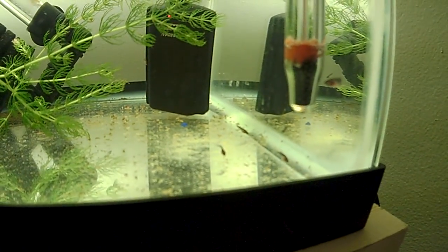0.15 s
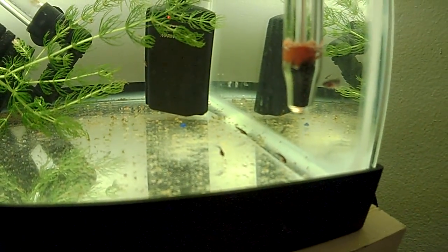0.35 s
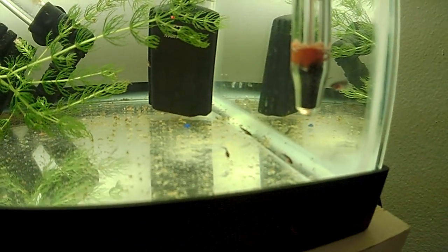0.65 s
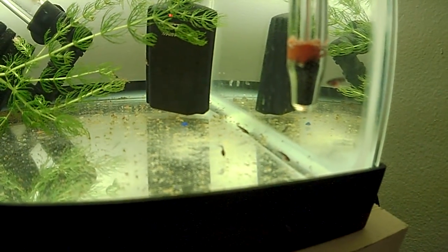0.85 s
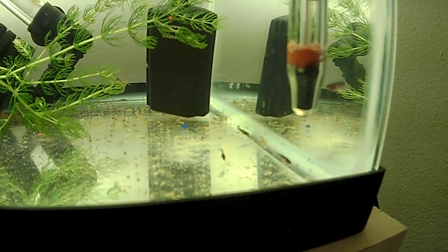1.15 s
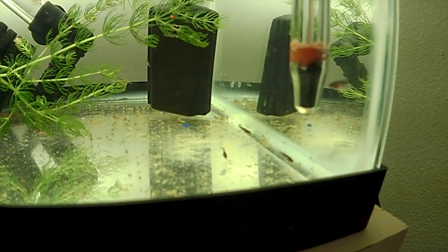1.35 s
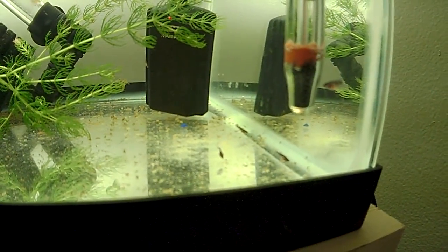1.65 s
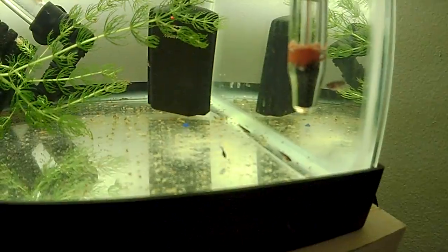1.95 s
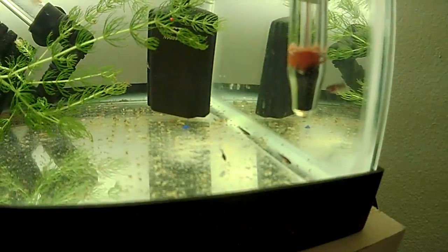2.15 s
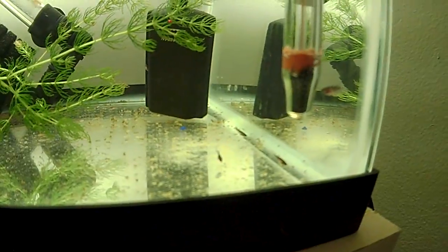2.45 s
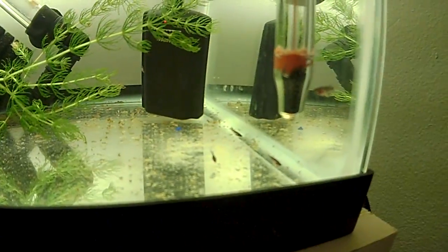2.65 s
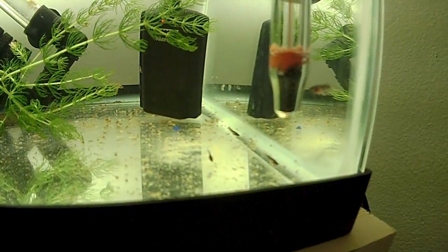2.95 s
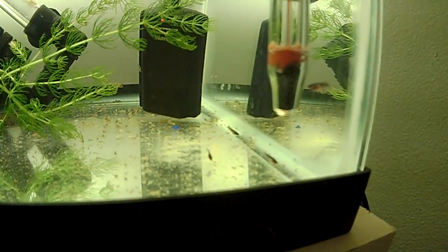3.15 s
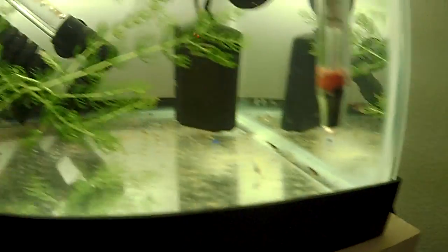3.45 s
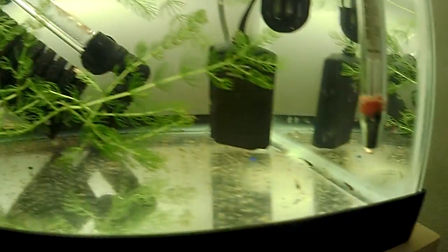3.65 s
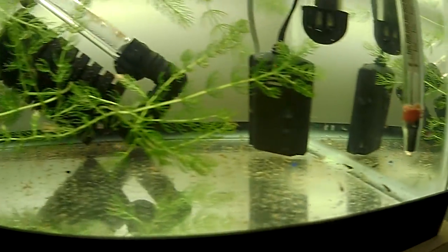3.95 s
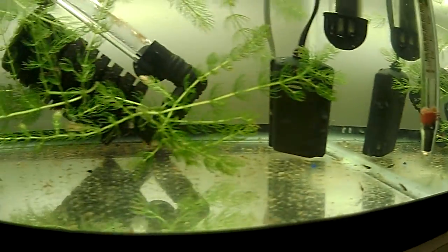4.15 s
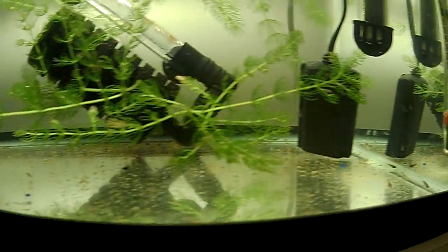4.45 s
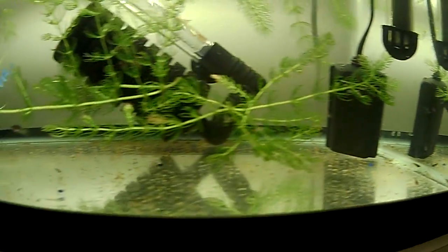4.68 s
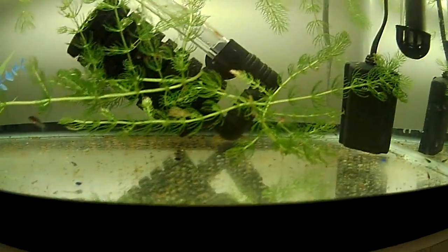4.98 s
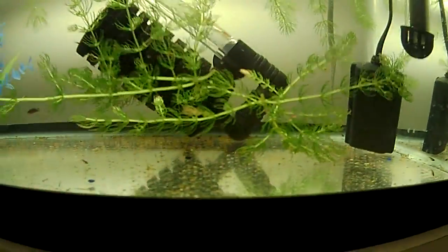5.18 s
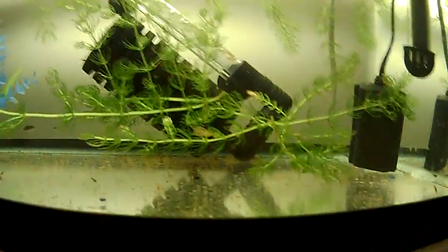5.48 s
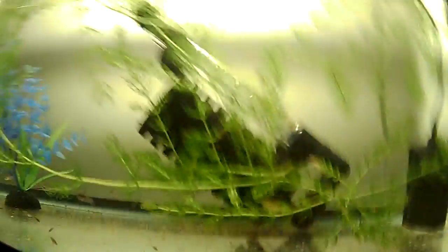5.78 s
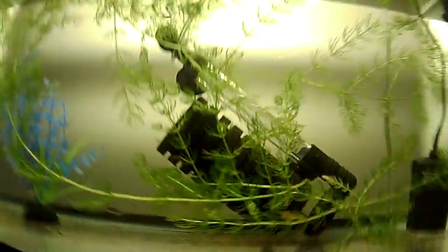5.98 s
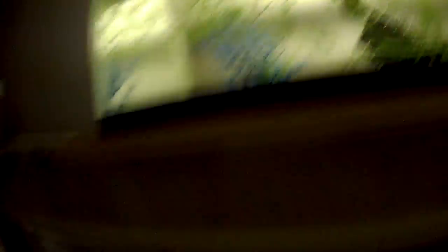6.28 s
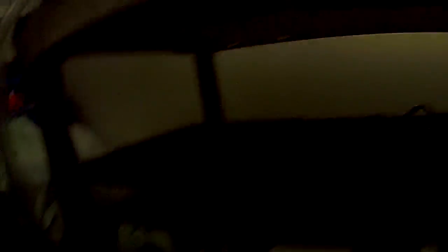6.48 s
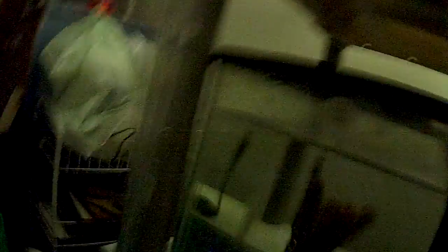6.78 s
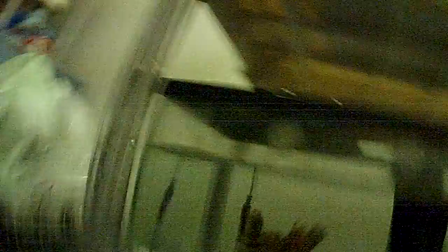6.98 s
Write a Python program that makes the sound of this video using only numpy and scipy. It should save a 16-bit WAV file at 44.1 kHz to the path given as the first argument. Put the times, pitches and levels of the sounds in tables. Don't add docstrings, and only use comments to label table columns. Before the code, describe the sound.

Low mains-like drone with bubbling filter noise in a room, broken late by finger ticks, one overloaded thump on the camera, and another sharp tap.

```python
import sys
import numpy as np
from scipy import signal
from scipy.fft import rfft, irfft, next_fast_len
from scipy.io import wavfile
from scipy.ndimage import uniform_filter1d, map_coordinates

SR = 44100
rng = np.random.default_rng(int(sys.argv[2]) if len(sys.argv) > 2 else 0)


def linear_from_db(decibels):
    return 10 ** (np.asarray(decibels, float) / 20)


def store_wav(level_fs):
    pcm = np.round(np.clip(np.atleast_2d(level_fs), -1, 1) * 32767)
    wavfile.write(sys.argv[1], SR, pcm.T.astype(np.int16))


N = 313991
T = np.arange(N) / SR


def unit(x):
    return x / np.sqrt(np.mean(x ** 2) + 1e-20)


def wobble(rate):
    coarse = T[::16]
    knots = rng.standard_normal(int(N * rate / SR) + 4)
    return np.interp(T, coarse, map_coordinates(knots, [coarse * rate]))


def hump(start, full, falls, gone, db):
    rise = (T - start) / (full - start)
    fall = (gone - T) / (gone - falls)
    return db * np.clip(np.minimum(rise, fall), 0, 1)


def filtered(x, response):
    m = next_fast_len(N + SR // 4)
    return irfft(rfft(x, m) * response(np.fft.rfftfreq(m, 1 / SR)), m)[..., :N]


def rush(spectrum, patchy_db):
    z = signal.stft(rng.standard_normal(N + 512), nperseg=512)[2]
    field = uniform_filter1d(rng.standard_normal(z.shape), size=4, axis=0)
    field = uniform_filter1d(field, size=8, axis=1)
    x = signal.istft(z * linear_from_db(patchy_db * unit(field)), nperseg=512)[1][:N]
    f, db = np.transpose([(0.96, -120)] + spectrum + [(SR, -120)])
    return unit(filtered(x, lambda hz: linear_from_db(np.interp(np.log(hz + 1), np.log(f), db))))


def damped(t, hz, db, t60, attack=0.00017):
    t = np.maximum(t, 0)
    return linear_from_db(db - 60 * t / t60) * np.sin(2 * np.pi * hz * t) * (1 - np.exp(-t / attack))


# time in seconds, pump level in dB.
PUMP_LEVEL = [(0, -17.5), (3.6, -17.5), (5.4, -18.5), (5.75, -19.5), (6.3, -18.6), (6.7, -23.5),
              (7.12, -28.5)]


def distance_change():
    s, db = np.transpose(PUMP_LEVEL)
    return np.interp(T, s, db) - PUMP_LEVEL[0][1]


# multiple of the mains frequency, level in dB re the fundamental,
# share of the level change that it follows (0 to 1, or reversed if negative).
PUMP_HARMONICS = [(1, -0.5, 1), (2, -28.5, .7), (3, -26.5, 1), (4, -30, -.3), (5, -29, 0), (6, -37, .5),
                  (7, -35.5, 0.3), (9, -33, 0.6), (10, -39.5, 0.4), (15, -37.5, 0.6)]


def pump():
    mains_hz = 60.013
    change_db = distance_change()
    turn = 2 * np.pi * (mains_hz * T - 1 / 4)
    hum = np.zeros(N)
    for k, rel_db, share in PUMP_HARMONICS:
        db = PUMP_LEVEL[0][1] + rel_db + share * change_db + .15 * np.sqrt(k) * wobble(8)
        phase = (k > 1) * rng.uniform(0, 2 * np.pi)
        hum += np.sqrt(2) * linear_from_db(db) * np.cos(k * turn + phase)
    return hum


# blade order, level in dB re the second order,
# change in dB per second after the camera begins to turn.
FAN_ORDERS = [(1, -18, 0), (4, -9.5, -5), (5, -15.5, -5)]


def fan():
    second_hz, level_db, drift_db, turn_s = 333.2, -38.7, .004, 5.1
    shaft = np.pi * np.cumsum(second_hz * linear_from_db(drift_db * wobble(1.5))) / SR

    def tone(order, db):
        phase = rng.uniform(0, 2 * np.pi)
        return np.sqrt(2) * linear_from_db(db + 1.1 * wobble(6)) * np.cos(order * shaft + phase)

    db = level_db + hump(6.1, 6.5, 6.55, 6.8, -4.5) + hump(6.6, 6.85, 7.2, 7.4, 4)
    third_gain = .05 + hump(3.6, 5.5, 6.5, 6.85, .95)
    out = tone(2, db) + third_gain * tone(3, -34.8)
    for order, rel_db, fade_db in FAN_ORDERS:
        out += tone(order, db + rel_db + fade_db * np.maximum(T - turn_s, 0))
    return out


# frequency in Hz, density in dB per Hz.
RUMBLE_SPECTRUM = [(15, -15), (40, -6), (90, -2), (150, -5.5), (230, -2.5), (350, -0.5), (450, 0),
                   (560, -9), (800, -64.5)]
# frequency in Hz, density in dB per Hz.
GURGLE_SPECTRUM = [(300, -48.5), (450, -8), (560, -4), (700, 2.5), (850, -3), (1050, -3.5), (1300, -8.5),
                   (1600, -21.5), (2200, -62.5)]
# frequency in Hz, density in dB per Hz.
HISS_SPECTRUM = [(900, -50), (1300, -8), (1850, -7), (2050, -1), (2220, -2.5), (2450, 1), (2650, -8),
                 (2800, -8), (3100, -6.5), (3500, -8), (4000, -7), (4300, -9), (4600, -14), (5200, -60)]
# frequency in Hz, density in dB per Hz.
FAR_SPECTRUM = [(700, -28.5), (900, -6.5), (1050, 2), (1250, -1), (1600, -10.5), (2200, -4), (2650, -13),
                (3100, -5.5), (3500, -8), (4600, -11), (5200, -60.5)]
# frequency in Hz, density in dB per Hz.
SWAY_SPECTRUM = [(5, -8), (18, -1.5), (30, -3), (45, -8.5), (70, -38.5)]
# frequency in Hz, width in Hz, lift in dB.
STANDING_WAVES = [(145, 21, 5.5), (284, 18, 6), (426, 21, 0.5), (467, 23, 4), (582, 10, 4.5), (610, 10, 3),
                  (700, 13, 3.5), (1000, 6.6, 4)]


def bubbling():
    change_db = distance_change()
    hand_db = hump(5.35, 6.0, 6.03, 6.15, 3.5)
    past_db = hump(3.6, 4.5, 7.2, 7.4, -1.6)
    nearer_db = hump(5.4, 6.2, 7.2, 7.4, 1.8)
    faced_db = hump(6.9, 7.12, 7.2, 7.4, 8)
    rumble_db = -39.2 + .2 * change_db + .6 * hand_db + .8 * past_db + .6 * wobble(2.2)
    gurgle_db = -40.5 + .05 * change_db + .7 * hand_db + past_db
    hiss_db = -41.6 + .9 * hand_db + nearer_db + .5 * past_db + faced_db + .5 * wobble(1.2)
    far_db = -70 + hump(6.15, 6.6, 6.78, 7.9, 27)

    swell = wobble(4.5)
    rumble = linear_from_db(rumble_db + 1.2 * swell) * rush(RUMBLE_SPECTRUM, patchy_db=1.0)
    gurgle = linear_from_db(gurgle_db + .5 * swell + 0.68 * wobble(30)) * rush(GURGLE_SPECTRUM, patchy_db=1.0)
    hiss = linear_from_db(hiss_db + .7 * wobble(12)) * rush(HISS_SPECTRUM, patchy_db=0.93)
    far = linear_from_db(far_db) * rush(FAR_SPECTRUM, patchy_db=3.0)
    sway = linear_from_db(-48.5) * rush(SWAY_SPECTRUM, patchy_db=2.5)

    def standing(hz):
        return linear_from_db(-1.5 + sum(db / (1 + (2 * (hz - c) / w) ** 2) for c, w, db in STANDING_WAVES))

    return filtered(rumble + gurgle, standing) + hiss + far + sway


# centre in seconds, length in seconds, level in dB, pitch in Hz.
BURSTS = [
    (0.04, 0.16, -37, 97),
    (0.36, 0.17, -37, 220),
    (4.524, 0.17, -37.5, 230),
    (5.569, 0.15, -39.5, 103.1),
    (5.75, .15, -36, 98.4),
    (5.891, 0.11, -36, 104.4),
    (6.394, 0.055, -40, 99.7),
]


def bloops():
    out = np.zeros(N)
    for s, length, db, hz in BURSTS:
        envelope = linear_from_db(db + 2.9 * wobble(25)) * np.exp(-2 * ((T - s) / length) ** 2)
        out += envelope * np.sin(2 * np.pi * hz * T + 1.5 * wobble(30))
    return out


def tick(t, rough, db, hz, crack_db):
    cycles = .62 + .05 * max(-13 - db, 0)
    after_db = -11
    burst = np.exp(-.5 * (t * hz / cycles * 1.1) ** 2) * np.cos(2 * np.pi * hz * t)
    crack = linear_from_db(crack_db) * np.exp(-.5 * (t / .00015) ** 2) * np.cos(2 * np.pi * 3900 * t)
    ring = damped(t, min(1.8 * hz, 2600), after_db - 2, 0.014) + damped(t, hz, after_db - 5.5, 0.02)
    return -linear_from_db(db) * (burst + crack + ring * rough)


# time in seconds, peak in dB, pitch in Hz, crack in dB re the peak.
FINGER_TICKS = [(5.532, -10.5, 954, -30), (5.5511, -27, 2400, -20), (5.5615, -1.5, 2383, 3),
                (5.562, -18, 1000, -20), (5.599, -22.5, 1500, -11.5), (5.726, -30, 2250, -22),
                (5.789, -32, 1300, -13.5), (5.842, -30, 1210, -24), (5.882, -16.5, 1277, -15),
                (5.9028, -16, 2350, -10), (5.9201, -12, 1294, 9), (5.967, -22, 1114, -18),
                (5.9705, -13, 1278, -15), (6.3797, -9, 1380, -4), (7.0316, 5, 1386, -11)]
# start in seconds, length in seconds, level in dB, brightness in dB.
STROKES = [(5.593, .04, -36, -3), (5.927, 0.018, -23, 0.5), (6.097, .035, -20, -1.5),
           (6.134, .017, -29, -1), (6.055, .03, -36, 4), (5.884, .035, -38, 2), (5.95, .04, -40, 0),
           (7.032, 0.0006, -20, 1.5), (6.804, 0.03, -40, 7), (6.914, .09, -41.5, 8), (7.0155, .005, -22, 4),
           (7.089, .035, -33, -8)]
# frequency in Hz, width in Hz, level in dB.
SHELL_MODES = [(1220, 390, 0.5), (1820, 370, -7.5), (2550, 520, -2.5), (3600, 500, -7)]


def fingers():
    out = np.zeros(N)
    rough = linear_from_db(3 * wobble(600))
    for s, *shape in FINGER_TICKS:
        near = slice(round((s - .01) * SR), round((s + .05) * SR))
        out[near] += tick(T[near] - s, rough[near], *shape)

    slips = rng.standard_normal(N) * linear_from_db(2.8 * wobble(350))

    def mode(k, c, w, db):
        ringing = filtered(slips, lambda f: 1j * f * w / (c * c - f * f + 1j * f * w))
        return unit(ringing) * linear_from_db(db) * (-1) ** k

    low, *high = [mode(k, *m) for k, m in enumerate(SHELL_MODES)]
    bright = sum(high)
    turn = 2 * np.pi * np.cumsum(1200 * linear_from_db(0.61 * wobble(120))) / SR
    squeak = linear_from_db(5.6 * wobble(250)) * np.sin(turn)
    squeak += linear_from_db(-0.5 + 2.7 * wobble(300)) * np.sin(2.1 * turn)
    for s, length, db, bright_db in STROKES:
        stroke = np.clip(np.minimum((T - s) / .003, (s + length - T) / .005 + 1), 0, 1)
        share = np.clip(min(30 * length, .58) * (db + 42) / 20, 0, .9)
        rub = share * squeak + (1 - share) * low + linear_from_db(bright_db) * (1 - 0.44 * share) * bright
        out += linear_from_db(db) * stroke * rub
    return out


# start in seconds, length in seconds, level in dB, pitch in Hz.
BLOW_CONTACTS = [
    (6.0085, .0058, 8, 1240),
    (6.0150, .003, 1, 2420),
    (6.0206, .002, 2, 1300),
    (6.0235, .003, -1.5, 870),
    (6.0288, .0006, -4, 950),
]
# centre in seconds, height in full scales, half width in seconds.
PRESSURE_PUSHES = [
    (6.007, -1, 0.0007),
    (6.018, -1.9, .0025),
    (6.026, -.4, 0.003),
    (7.0188, .68, 0.0011),
    (7.0255, -.27, 0.0032),
    (7.033, .2, .002),
]
# frequency in Hz, level in dB, t60 in seconds.
BLOW_RING = [
    (1905, -11.5, 0.15),
    (1443, -18.5, 0.033),
    (330, -10, .06),
]


def knock():
    rise_s, contact_t60_s, leak_s = .0008, .008, .04
    first_s = BLOW_CONTACTS[0][0]
    near = slice(int((first_s - .01) * SR), int((first_s + .3) * SR))
    t, out = T[near], np.zeros(N)
    clock = 2 * np.pi * np.cumsum(linear_from_db(2.1 * wobble(700)[near])) / SR
    grit = 0.4 * rush(RUMBLE_SPECTRUM, patchy_db=4) + 0.3 * rush(HISS_SPECTRUM, patchy_db=2.5)
    grit = grit[near]

    def buzz(turn):
        return np.sin(turn) + .45 * np.sin(1.9 * turn) + 0.3 * np.sin(2.7 * turn) + grit

    def grip(s, length, t60):
        return np.clip((t - s) / rise_s + 1, 0, 1) * linear_from_db(-60 * np.maximum(t - s - length, 0) / t60)

    rattle = 0
    for s, length, db, hz in BLOW_CONTACTS:
        rattle = rattle + linear_from_db(db) * grip(s, length, contact_t60_s) * buzz(hz * clock)
    last_s, *_, last_hz = BLOW_CONTACTS[-1]
    tail = linear_from_db(-25) * grip(last_s, 0, .13) * buzz(1.4 * last_hz * clock)
    ring = sum(damped(t - 6.027, *mode, attack=0.0031) for mode in BLOW_RING)
    out[near] = rattle + tail + linear_from_db(1.2 * wobble(150)[near]) * ring

    shove = sum(height * np.exp(-.5 * ((T - s) / width) ** 2) for s, height, width in PRESSURE_PUSHES)
    return out + filtered(shove, lambda hz: 1 - 1 / (1 + 2j * np.pi * hz * leak_s))


def scene():
    sound = pump() + fan() + bubbling() + bloops() + fingers() + knock()
    return np.array([sound, sound])


def band_limit(x):
    return signal.sosfilt(signal.butter(12, 4450, fs=SR, output="sos"), x)


def record(dry):
    top_hz, lag_s = 3770, 5.62 / 44100
    narrow = filtered(dry, lambda hz: 1 / np.sqrt(1 + (hz / top_hz) ** 30))
    side = np.array([[-.5], [.5]])

    def lag(hz):
        phase = 2 * np.pi * hz * lag_s - .035 * hz / (hz + 150)
        return np.exp(1j * side * phase)

    return band_limit(np.clip(filtered(narrow, lag), -1, 1))


dry = scene()
out = record(dry)
store_wav(out)
```